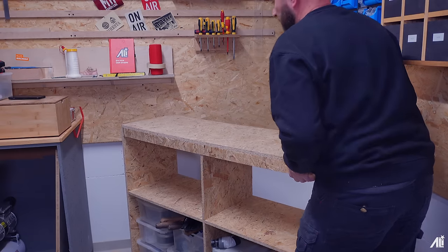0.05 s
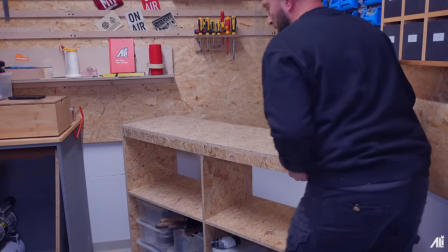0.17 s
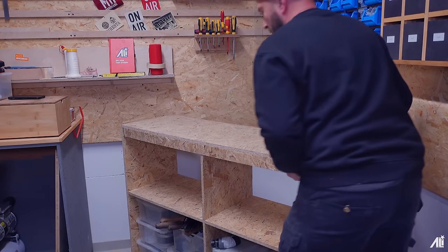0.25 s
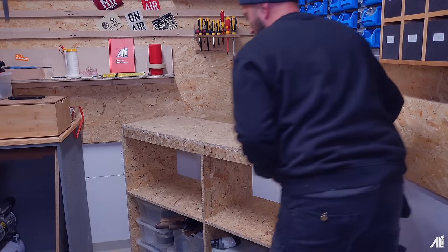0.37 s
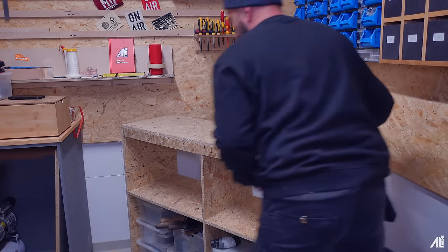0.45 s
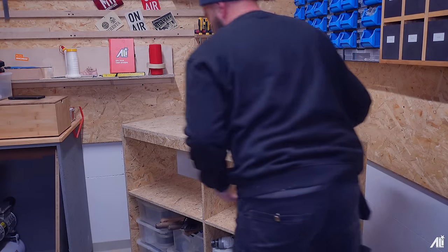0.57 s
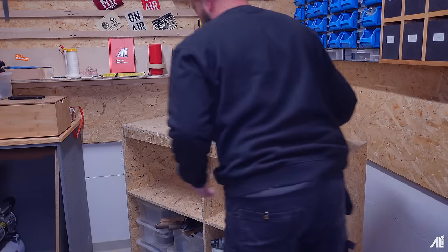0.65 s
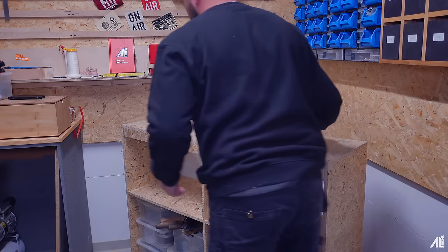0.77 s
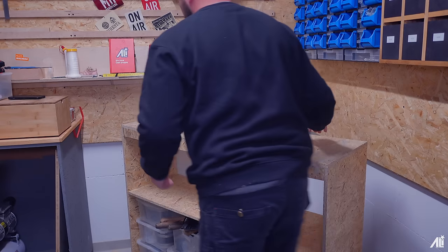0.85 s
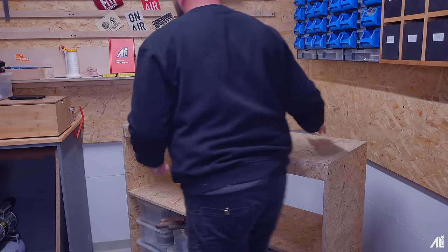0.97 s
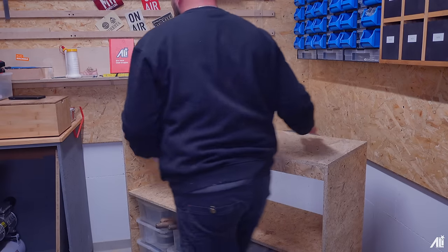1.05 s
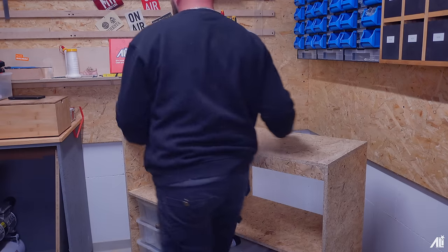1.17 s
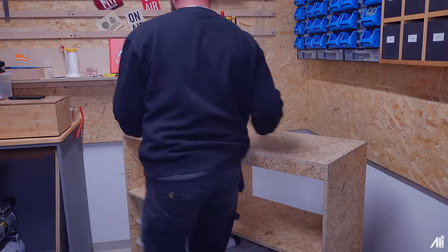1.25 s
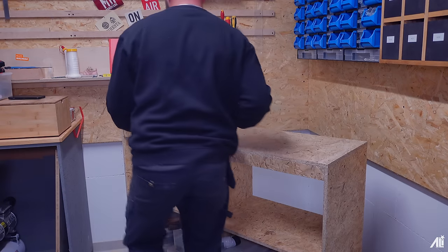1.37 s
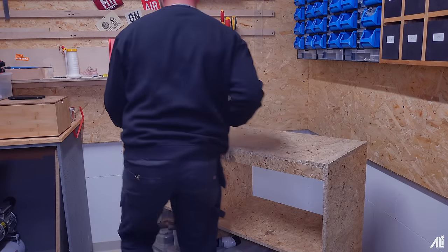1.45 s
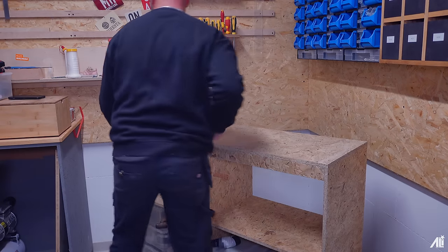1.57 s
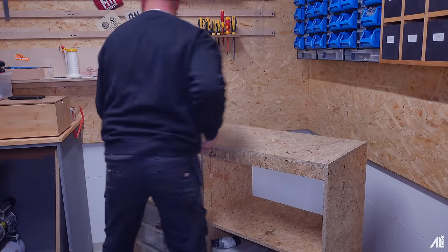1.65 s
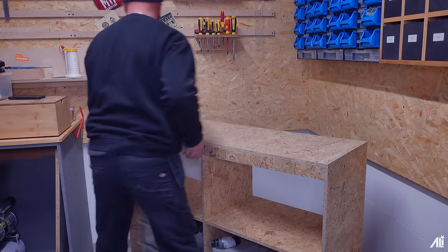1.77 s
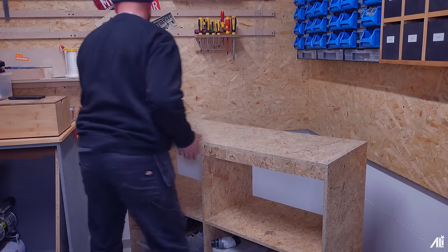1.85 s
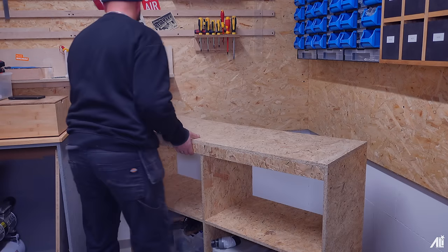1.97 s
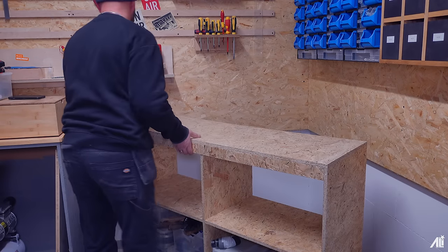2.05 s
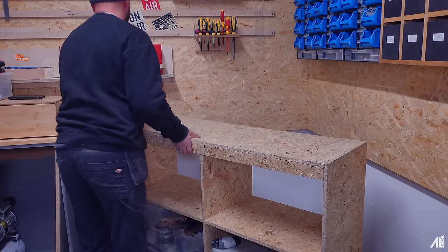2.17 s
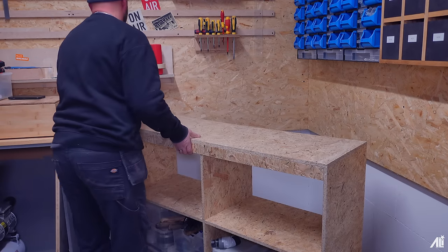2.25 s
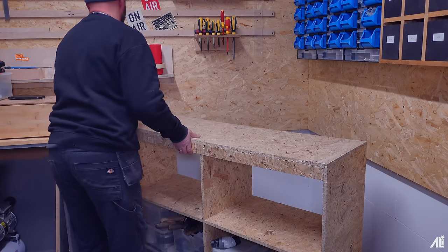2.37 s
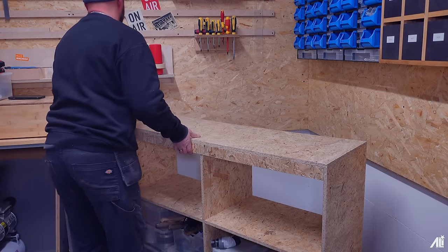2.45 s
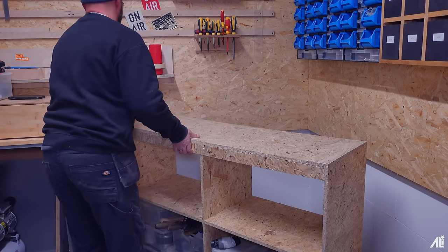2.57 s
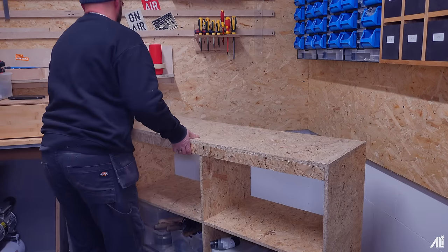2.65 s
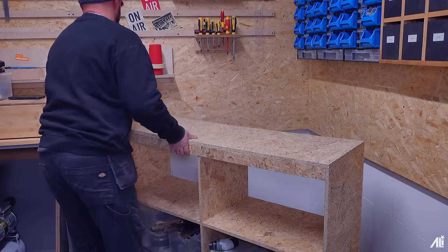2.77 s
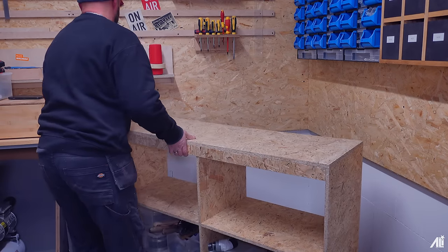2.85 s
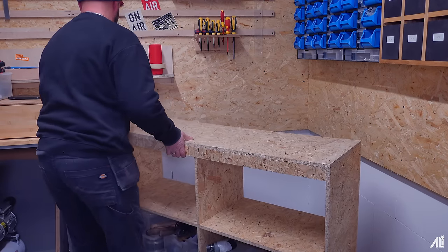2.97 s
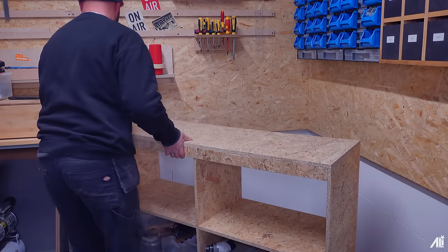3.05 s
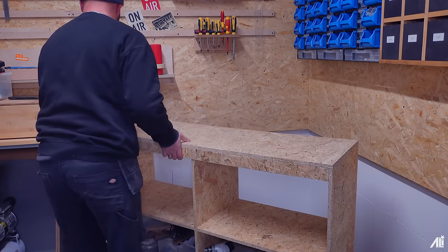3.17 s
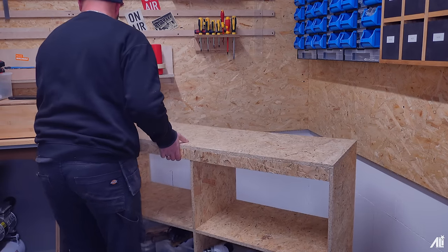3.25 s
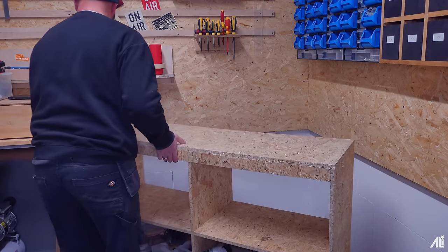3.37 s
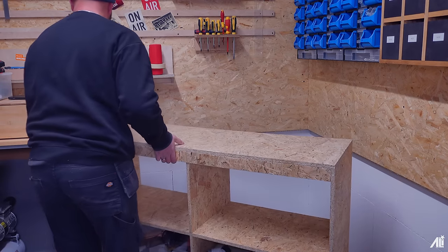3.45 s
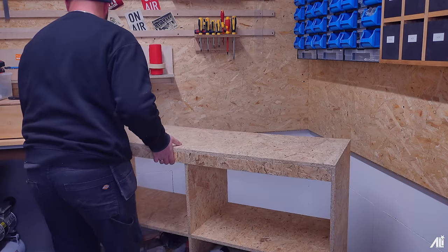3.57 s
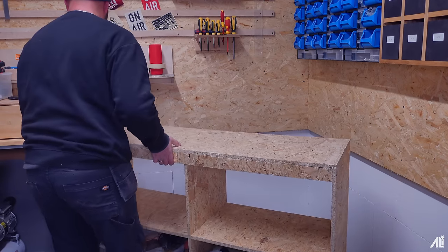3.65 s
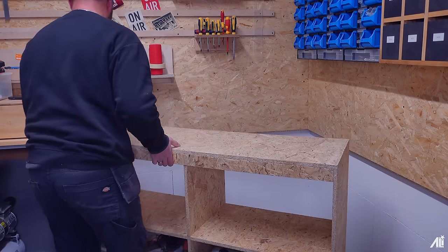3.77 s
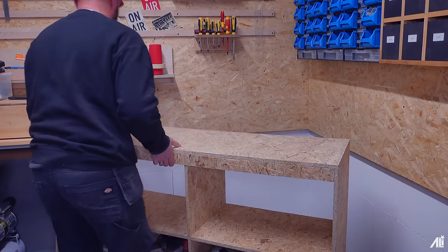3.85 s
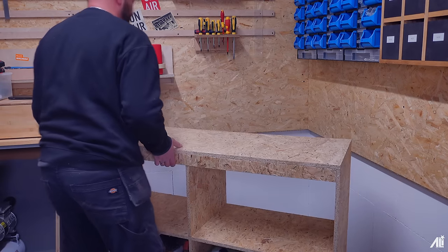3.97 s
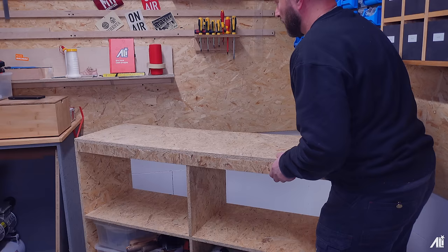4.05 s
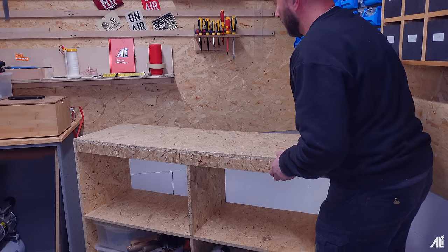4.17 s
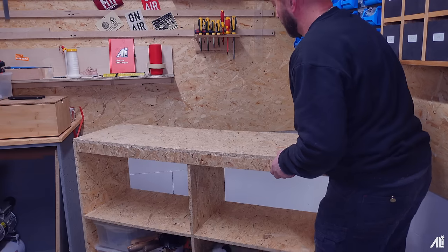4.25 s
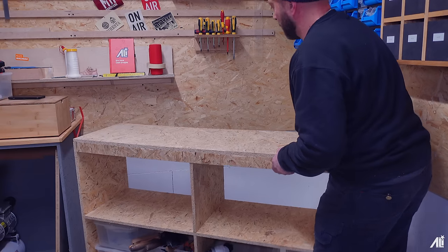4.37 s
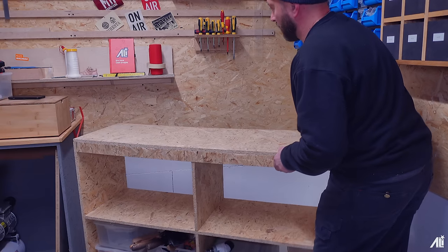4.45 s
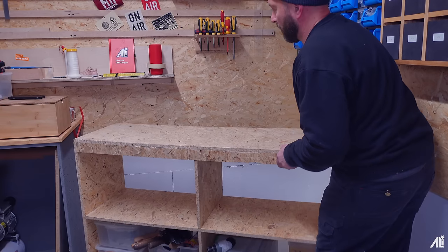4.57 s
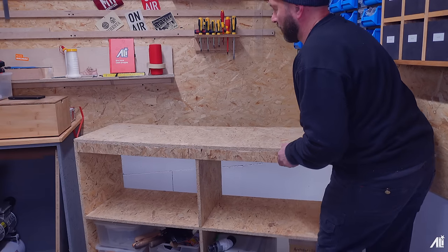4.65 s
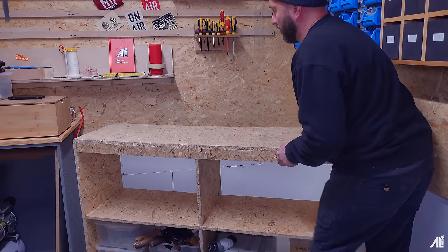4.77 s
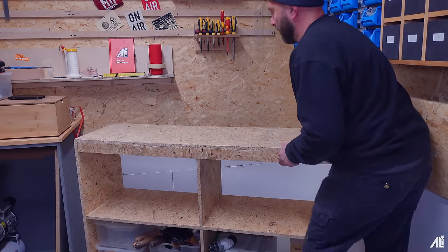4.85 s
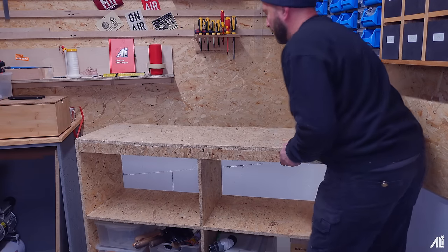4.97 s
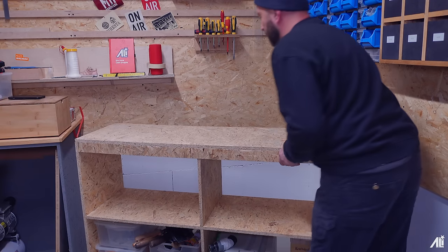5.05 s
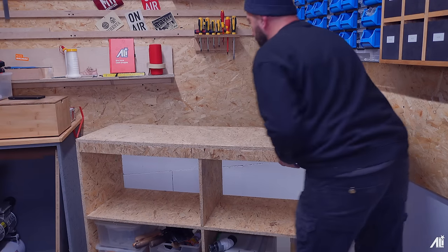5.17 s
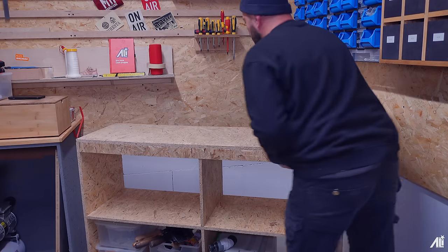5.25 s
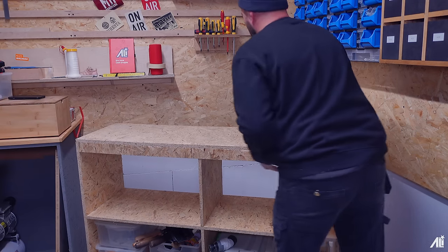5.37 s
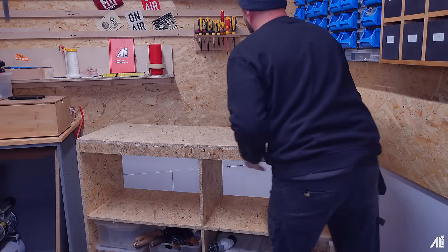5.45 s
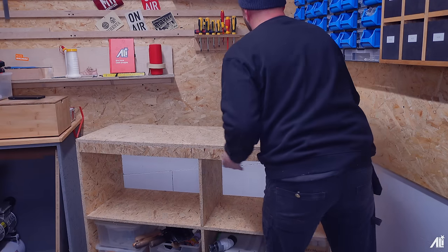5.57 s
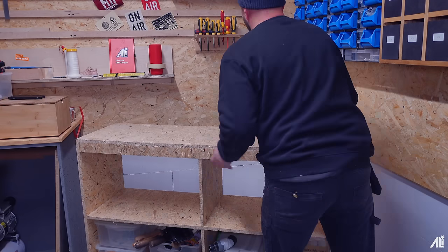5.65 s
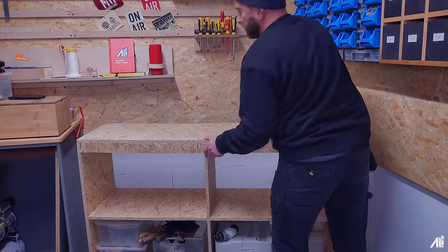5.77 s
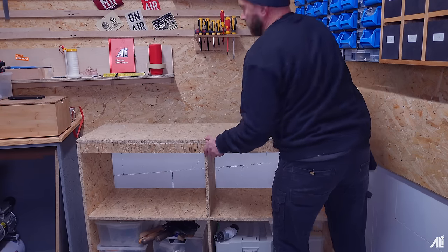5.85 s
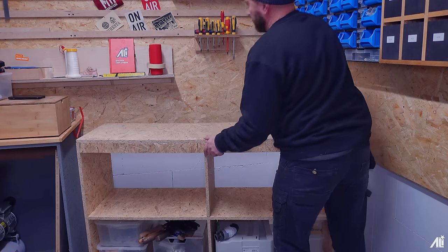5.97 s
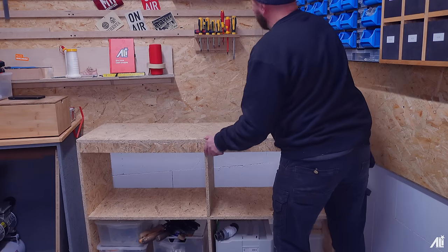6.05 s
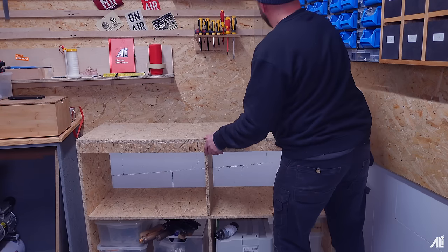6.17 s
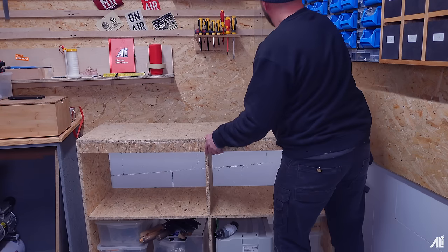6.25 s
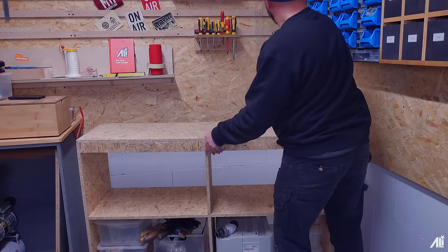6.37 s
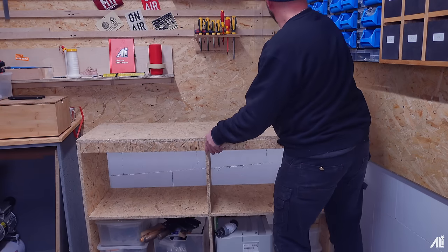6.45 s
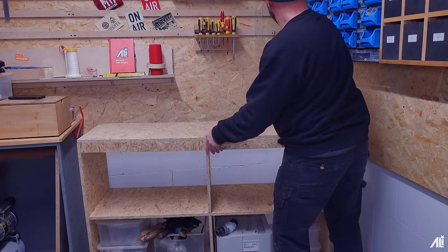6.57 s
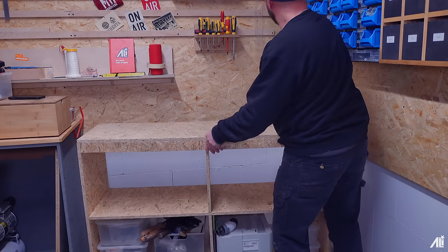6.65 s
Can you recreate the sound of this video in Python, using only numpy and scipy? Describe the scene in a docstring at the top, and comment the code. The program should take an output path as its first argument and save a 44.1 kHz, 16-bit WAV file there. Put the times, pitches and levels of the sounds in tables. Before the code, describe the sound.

Close microphone, quiet room with a slight tail. Soft steps, floor thuds and fabric rustle come first, then a moderate, uneven scrape of a hollow wooden cabinet over grit. A much louder groaning push follows, ending in thin squeaks. Feet shuffle and small loose bits tick, then the cabinet drags again in a strong, low, vibrating groan that is cut off while still sounding.

```python
"""A heavy chipboard cabinet is shoved three times over a gritty workshop floor, heard close up.
Slipping noise rings its boards, drawn pitch curves drone, groan and squeak, and filtered noise crunches
as grit. Jolts add bursts of crushed grit and wooden knocks. Around the shoves shoes scuff, clothes rustle,
the floor thuds and small things tick; jolts and ticks leave a faint room tail over a faint steady noise."""
import sys
import numpy as np
from scipy import signal
from scipy.fft import rfft, irfft, next_fast_len
from scipy.io import wavfile
from scipy.ndimage import uniform_filter1d, map_coordinates

SR = 44100
rng = np.random.default_rng(int(sys.argv[2]) if len(sys.argv) > 2 else 0)


def dump_mix(stems):
    """Bounce the given channels to the path in sys.argv[1] as a 16-bit WAV at rate SR."""
    frames = np.atleast_2d(stems).T  # one column per channel
    limited = np.clip(frames, -1, 1)  # hard clip at full scale
    pcm = np.round(limited * 32767).astype(np.int16)
    wavfile.write(sys.argv[1], SR, pcm)


N = 296352  # length [samples]


def amp(db):
    """Linear gain of a level in dB."""
    return 10 ** (np.asarray(db) / 20)


def unit(x):
    """The signal brought to an RMS of 1."""
    return x / np.sqrt(np.mean(x ** 2) + 1e-20)


def along(points, hz):
    """Reads (frequency, value) points on a log frequency axis."""
    f, v = np.transpose(points)
    return np.interp(np.log(hz + 1), np.log(f + 1), v)


def fade(times, t):
    """1 inside the times with 8 ms edges; a sound going at either end of the scene is held."""
    start = times[0] if times[0] > .05 else -np.inf
    end = times[-1] if times[-1] < N / SR - .05 else np.inf
    return np.clip(np.minimum(t - start, end - t) / .008 + 1, 0, 1)


def gains(tables):
    """Gain per sample for each dB column; silent outside the tables."""
    t, total = np.arange(N) / SR, 0
    for rows in tables:
        times, *columns = np.transpose(rows)
        curves = np.array([amp(np.interp(t, times, column)) for column in columns])
        total = total + fade(times, t) * curves
    return total


def filtered(x, response):
    """Applies a complex response of frequency to the signal."""
    size = next_fast_len(len(x) + SR // 2)
    spectrum = rfft(x, size) * response(np.fft.rfftfreq(size, 1 / SR))
    return irfft(spectrum, size)[:len(x)]


def modes(table):
    """Causal response of damped resonances with alternating sign."""
    def response(f):
        return sum((-1) ** k * amp(db) * 1j * f * width / (hz * hz - f * f + 1j * f * width)
                   for k, (hz, width, db) in enumerate(table))
    return response


def wobble(rate, size=N):
    """A smooth random curve, rate knots a second."""
    knots = rng.standard_normal(int(N * rate / SR) + 4)
    return map_coordinates(knots, [np.arange(size) * rate / SR])


def slips(rate, spread_db, smooth):
    """Random slips of uneven size, rate a second on average, over a smooth rub."""
    chance, size, rub = rng.random(N), rng.standard_normal(N), rng.standard_normal(N)
    return unit((chance < rate / SR) * amp(spread_db * size)) + smooth * rub


def coloured(x, spectrum):
    """Shapes a signal by a spectrum table and brings it to an RMS of 1."""
    return unit(filtered(x, lambda hz: amp(along(spectrum, hz))))


def steadied(x, seconds, grip):
    """A steady push evens out the slower swings of a shaking."""
    size = np.sqrt(np.abs(uniform_filter1d(x ** 2, int(seconds * SR))) + 1e-4)
    return unit(x / size ** np.clip(grip, 0, 1))


def patchy(x, depth_db, bins, frames):
    """Loose contact favours now one patch of frequencies, now another."""
    z = signal.stft(x, nperseg=512)[2]
    field = uniform_filter1d(rng.standard_normal(z.shape), bins, 0)
    field = uniform_filter1d(field, frames, 1)
    return unit(signal.istft(z * amp(depth_db * unit(field)), nperseg=512)[1][:N])


def burst(hz, t60, wide, rise):
    """Noise round a centre frequency that starts fast and dies away."""
    t = np.arange(SR // 4) / SR
    noise = unit(filtered(rng.standard_normal(len(t)), lambda f: modes([(hz, wide * hz, 0)])(f) ** 2))
    return noise * amp(-60 * t / np.clip(t60, .004, .4)) * (1 - np.exp(-t / rise))


def tone(rows, waver, blur_hz, overtone_db):
    """A vibration on a wavering pitch curve with one overtone; roughness blurs it into narrow noise."""
    times, hz, db, rough = np.transpose(rows)
    t = np.arange(N) / SR
    live = fade(times, t) > 0
    t, size, out = t[live], live.sum(), np.zeros(N)
    pitch = np.interp(t, times, hz) * (1 + waver * wobble(60, size))
    phase = 2 * np.pi * np.cumsum(pitch) / SR
    # the pitch and a weaker overtone an octave above
    cycle = np.exp(1j * phase) + amp(overtone_db) * np.exp(2j * phase)
    share = np.clip(np.interp(t, times, rough), 0, 1)
    noise = wobble(blur_hz, size) + 1j * wobble(blur_hz, size)
    blur = np.sqrt(1 - share) + np.sqrt(share / 2) * noise
    level = fade(times, t) * amp(np.interp(t, times, db))
    out[live] = np.sqrt(2) * level * np.real(blur * cycle)
    return out


def catch(row, edge_db, rough):
    """A mode catches, swells to its peak and lets go while its pitch glides."""
    start, length, first, last, db, top = row
    return [(start + u * length, first + u * (last - first), db + drop, rough)
            for u, drop in [(0, edge_db), (np.clip(top, .05, .95), 0), (1, edge_db)]]


# Tilt of the faint microphone noise: (frequency [Hz], relative density [dB per Hz])
AIR_SPECTRUM = [(12, -10), (25, 2), (50, -6), (100, -9), (300, -5), (650, -10), (1800, -19), (6000, -24),
                (12000, -32), (15600, -36)]
AIR_DB = -65  # mean level [dB]


def air():
    """Faint coloured noise whose level drifts gently."""
    return amp(AIR_DB + wobble(11.0)) * coloured(rng.standard_normal(N), AIR_SPECTRUM)


# Decay of the room: (frequency [Hz], t60 [s])
ROOM_DECAY = [(100, 0.31), (1000, 0.88), (10000, 0.085)]


def room(x):
    """Each frequency of the room's answer dies at its own speed."""
    hz, t, z = signal.stft(rng.standard_normal(SR // 2), SR, nperseg=256)
    decay = amp(-60 * t / along(ROOM_DECAY, hz)[:, None])
    tail = signal.istft(z * decay, SR, nperseg=256)[1]
    delayed = np.pad(x, (300, 0))  # samples before the answer
    return signal.fftconvolve(delayed, tail / np.linalg.norm(tail))[:N]


# Stirring around the shoves: (time [s], soles level [dB], cloth level [dB])
STIRRING = [
    [(0.012, -54.5, -58), (0.446, -57, -64.5), (0.618, -62, -71.5), (0.778, -85, -107), (0.996, -69.5, -66),
     (1.136, -72, -70), (1.27, -79, -81)],
    [(1.665, -62, -62), (1.757, -79, -76), (1.865, -77, -66.5), (2.021, -48.5, -68), (2.217, -70, -74),
     (2.349, -61.5, -67.5), (2.513, -66, -72), (2.56, -65, -72.5)],
    [(4.95, -60, -65), (5.028, -51.5, -65.5), (5.236, -61.5, -63), (5.308, -55, -57), (5.43, -57.5, -64.5),
     (5.516, -63, -69), (5.72, -76, -94)],
]
# Steps and shuffles: (peak time [s], length [s], scuff level [dB], rustle level [dB], thud level [dB])
FOOTSTEPS = [(-0.004, 0.065, -49, -78, -35), (0.44, 0.15, -66, -64, -58), (0.59, 0.068, -53, -54.5, -64),
             (0.673, 0.061, -78, -82, -50), (0.756, 0.079, -51, -69, -66), (1.135, 0.12, -50, -53.5, -57),
             (1.41, .1, -80, -90, -66), (1.63, .08, -78, -90, -54), (1.704, 0.055, -50, -65, -37),
             (1.744, .05, -69, -76, -43), (1.793, 0.07, -73, -72, -33), (1.854, 0.16, -47, -54.5, -51),
             (1.915, 0.035, -64, -63, -51), (2.066, 0.13, -38, -44, -69), (2.124, 0.11, -34, -47, -59),
             (2.27, 0.073, -58, -66, -73), (2.428, 0.063, -54.5, -81, -52), (2.57, 0.067, -51.5, -73, -59),
             (4.109, .15, -55, -56, -38.5), (4.927, 0.061, -65, -67.5, -36.5),
             (5.094, 0.092, -58, -58, -54), (5.238, 0.096, -53.5, -63, -51), (5.38, 0.056, -62, -60, -73),
             (5.697, 0.12, -52.5, -60, -66)]
STEP_RISE, STEP_EDGE_DB = 0.37, -16.5  # share of a step before its peak; its ends under its peak [dB]
SWAY_DB = -6  # floor thud relative to the stirring soles [dB]


def footwork():
    """Gains of scuff, rustle and thud: each step swells and dies over the stirring."""
    soles, cloth = gains(STIRRING)
    total, t = np.array([soles, cloth, amp(SWAY_DB) * soles]), np.arange(N) / SR
    for peak, length, *db in FOOTSTEPS:
        near = np.abs(t - peak) < .5
        before, after = (peak - t[near]) / STEP_RISE, (t[near] - peak) / (1 - STEP_RISE)
        away = np.maximum(before, after) / length  # 0 at the peak, 1 at the ends
        total[:, near] += amp(db)[:, None] * amp(STEP_EDGE_DB * away)
    return total


# Colours of floor thud, sole scuff and cloth rustle: (frequency [Hz], relative density [dB per Hz])
THUD_SPECTRUM = [(18, -45), (30, -3), (87, 4.5), (146, -0.5), (178, 0.5), (210, -14.5), (300, -3.5),
                 (390, -35), (660, -120)]
SCUFF_SPECTRUM = [(130, -45), (210, -4.5), (300, 3), (498, 0.5), (757, -2), (1010, -3.5), (1090, -2.5),
                  (1590, -5), (2600, -9), (3380, -19), (5720, -120)]
RUSTLE_SPECTRUM = [(1180, -22.5), (2000, -17), (2220, -8), (2460, -13), (2610, -50), (2820, -7),
                   (6050, -6.5), (15600, -26)]


def moves():
    """Weight shifts thud in the floor, soles scuff, cloth rustles: slips through three colours."""
    scuff, rustle, thud = footwork()
    floor = coloured(slips(60, spread_db=1, smooth=1.0), THUD_SPECTRUM)
    floor = steadied(floor, 0.057, grip=0.34)
    soles = coloured(slips(1200, spread_db=6.5, smooth=1.7), SCUFF_SPECTRUM)
    soles = patchy(soles, depth_db=3.0, bins=2, frames=8)
    cloth = coloured(slips(2000, spread_db=2.5, smooth=3), RUSTLE_SPECTRUM)
    cloth = patchy(cloth, depth_db=1.2, bins=6, frames=8)
    return thud * floor + scuff * soles + rustle * cloth


def snap(hz, t60, wide, dust_db):
    """One sharp contact rings a resonance; a strong noise burst with the given t60 sounds with it."""
    blow = np.zeros(SR // 4)
    blow[0] = 1
    ring = filtered(blow, lambda f: modes([(hz, wide * hz, 0)])(f) ** 2)
    return ring / np.abs(ring).max() + amp(dust_db) * burst(hz, t60, wide=1.8, rise=0.0025)


# Dull taps of shoes, hands and boards:
# (time [s], ring peak level [dB], centre frequency [Hz], noise burst t60 [s])
DULL_TAPS = [(0.458, -38.5, 524, 0.031), (0.731, -51, 600, 0.02), (0.831, -53, 700, 0.02),
             (1.091, -39, 401, 0.022), (1.112, -39.5, 1050, 0.067), (1.409, -42, 405, 0.063),
             (1.672, -42, 394, 0.033), (1.694, -39.5, 750, 0.031), (2.253, -40.5, 385, 0.018),
             (4.906, -35.5, 820, 0.03), (6.349, -25.5, 620, 0.05), (6.521, -19.5, 669, 0.041)]
# Bright clicks of loose bits: (time [s], ring peak level [dB], centre frequency [Hz])
BRIGHT_CLICKS = [(0.6729, -54, 5630), (0.8305, -55, 5750), (5.218, -43.5, 3670), (5.3828, -27.5, 4870),
                 (5.4185, -38, 4080), (5.448, -47.5, 6250), (5.569, -49.5, 6100), (5.6805, -58, 3700)]
CLICK_T60_S = 0.014  # of the noise burst


def ticks():
    """Dull taps ring broadly, bright clicks of loose bits ring narrowly."""
    out = np.zeros(N + SR)
    for time, db, hz, t60 in DULL_TAPS:
        out[round(time * SR):][:SR // 4] += amp(db) * snap(hz, t60, wide=0.99, dust_db=-1.5)
    for time, db, hz in BRIGHT_CLICKS:
        out[round(time * SR):][:SR // 4] += amp(db) * snap(hz, CLICK_T60_S, wide=0.17, dust_db=-0.5)
    return out[:N]


# Jolts of the feet on grit: (time [s], level before the crush and knock trims [dB], centre frequency [Hz],
# crush t60 [s], wooden knock relative to the jolt, before its trim [dB], chirp relative to the crush [dB])
FOOT_JOLTS = [(2.684, -34, 3400, 0.17, 15, -4), (2.9992, -25, 2630, 0.25, 12, -12),
              (3.1285, -28, 3950, 0.13, 18, -14), (3.2129, -22.5, 3850, 0.11, 20, -15),
              (3.3356, -17, 3150, 0.07, 16.5, -24), (3.4342, -29, 3500, 0.15, 17.5, 1),
              (3.6296, -24, 2270, 0.33, 18, -8), (4.0847, -28.5, 3100, 0.16, 18, -18),
              (4.2299, -18.5, 4630, 0.12, 10, -3), (4.2841, -28, 5220, 0.12, 16, -4),
              (4.3807, -30.5, 2400, 0.15, 0, -14), (4.4022, -30, 4240, 0.15, 29, -10),
              (4.519, -31, 3760, 0.16, 29, -1), (4.786, -15, 3980, 0.054, -2, -16),
              (5.0901, -45, 2080, 0.11, 14, -11), (5.7657, -37, 3510, 0.11, 17.5, 5.5),
              (5.9135, -24, 3470, 0.3, 2, 1), (5.9588, -26, 3750, 0.15, 7, 0),
              (6.0024, -24, 3920, 0.24, -11, 0), (6.0271, -30, 4000, 0.15, 3, 3),
              (6.139, -40, 3980, 0.22, 5, 9.5), (6.1657, -27, 3894, 0.068, 13.5, 12),
              (6.2921, -30.5, 3220, 0.091, 17, -15), (6.3456, -20.5, 2270, 0.084, 7, -19),
              (6.518, -29, 3152, 0.097, 19, 4)]
JOLT_RISE_S = 0.0024  # time constant of the onset
CRUSH_TRIM_DB, KNOCK_TRIM_DB = -11.0, 32


def jolts():
    """Each jolt crushes grit, chirps briefly at one pitch and knocks the wood through a soft contact."""
    crush, blows = np.zeros(N + SR), np.zeros(N)
    for time, db, hz, t60, knock_db, chirp_db in FOOT_JOLTS:
        grit = burst(hz, t60, wide=0.95, rise=JOLT_RISE_S)
        chirp = burst(hz, t60 / 2, wide=0.17, rise=JOLT_RISE_S)
        crush[round(time * SR):][:SR // 4] += amp(db + CRUSH_TRIM_DB) * (grit + amp(chirp_db) * chirp)
        blows[round(time * SR)] = amp(db + knock_db + KNOCK_TRIM_DB)

    def wood(f):
        ring = modes(SIDE_MODES + PANEL_MODES)(f) + amp(-16.0) * modes(SHELF_MODES)(f)
        return ring / (1 + 1j * f / 900)  # soft contact dulls the blow

    return crush[:N] + filtered(blows, wood)


# Thin squeaks of edges: (start [s], length [s], first pitch [Hz], last pitch [Hz],
# peak level before the squeak trim [dB], peak position [share of length])
EDGE_SQUEAKS = [(3.62, .26, 3960, 4560, -46, .65), (4.715, .07, 3440, 3540, -39, .75),
                (4.95, .13, 2960, 2900, -51, .4), (4.9, .07, 7400, 7480, -60, .7),
                (4.93, .06, 8050, 8150, -63, .5), (4.9, .15, 5670, 6000, -61, .33),
                (4.96, .14, 1098, 881, -48, .7), (4.96, .09, 3810, 3860, -65, .3)]
SQUEAK_EDGE_DB, SQUEAK_ROUGH, SQUEAK_TRIM_DB = -4.5, 0.83, -3  # ends under peak [dB]; roughness 0-1; trim


def squeaks():
    """Edges squeak: short, rough gliding tones."""
    return amp(SQUEAK_TRIM_DB) * sum(
        tone(catch(row, SQUEAK_EDGE_DB, SQUEAK_ROUGH), waver=.004, blur_hz=450, overtone_db=-40)
        for row in EDGE_SQUEAKS)


# Higher modes that catch for a while: (start [s], length [s], first pitch [Hz], last pitch [Hz],
# peak level [dB], peak position [share of length], roughness [0-1])
MODE_GROANS = [(2.836, 0.17, 396, 410.4, -16.5, 0.8, 0), (4.37, 0.17, 360.9, 416, -19, 0.14, .2),
               (4.44, .11, 277.2, 271.3, -14.5, 0.84, 0.22), (4.55, .04, 291, 282, -23, 0.78, .1),
               (4.59, 0.12, 177.4, 175, -13.5, 0.78, 0.27), (4.768, 0.087, 293.3, 284.6, -28.5, 0.45, .2),
               (5.9, 0.3, 184.7, 190, -17.5, 0.11, 0.16), (5.908, .15, 300.4, 278.4, -24.5, 0.18, 0.16),
               (6.16, 0.42, 170.7, 180.5, -25, 0.36, .25), (6.46, 0.22, 182.8, 171, -20.5, 0.63, 0.3),
               (6.643, .08, 231, 239.8, -21, .6, 0)]
GROAN_EDGE_DB = -11  # ends under the peak


def groans():
    """Higher modes groan: each swells, glides and lets go."""
    return sum(tone(catch(row, GROAN_EDGE_DB, rough), waver=0.0075, blur_hz=40.2, overtone_db=-22.5)
               for *row, rough in MODE_GROANS)


def drone():
    """Slipping feet drone on the pitch curve of each shove, roughened by its grip."""
    total = 0
    for rows, (*_, rough) in zip(SHOVE_CURVES, GRIP_BLENDS):
        curve = [(time, hz, db, rough) for time, _, _, hz, db in rows]
        total = total + tone(curve, waver=0.0042, blur_hz=45.97, overtone_db=-16.5)
    return total


# Colour of the crunching grit: (frequency [Hz], relative density [dB per Hz])
GRIT_SPECTRUM = [(760, -40), (1300, 0.5), (1440, -1), (2230, -7.5), (3140, -7), (3640, -8), (4030, -6.5),
                 (5120, -11), (11300, -24), (15600, -38)]


def crunch(clumps):
    """Grit under the feet crunches: dense slips, swelling in clumps, patchy in colour."""
    grains = coloured(slips(2500, spread_db=5, smooth=1.23) * clumps, GRIT_SPECTRUM)
    return patchy(grains, depth_db=1.54, bins=3, frames=6)


def boards(table, rate, skirt, seconds):
    """Slips ring a set of boards; the skirt keeps the ring inside their range."""
    ring = filtered(slips(rate, spread_db=-1.5, smooth=0.72), lambda f: modes(table)(f) * modes([skirt])(f))
    return steadied(ring, seconds, grip=0.48)


UNEVEN_DB, UNEVEN_RATE = 2.05, 16  # random swell [dB]; knots a second


def uneven():
    """A gain that swells by chance."""
    return amp(UNEVEN_DB * wobble(UNEVEN_RATE))


# Resonances of the boards, each: (frequency [Hz], width [Hz], level [dB])
CARCASS_MODES = [(60, 9.7, -12), (79.4, 19, -2)]
SIDE_MODES = [(169.2, 23.6, -1), (210.2, 9.3, 1), (240.3, 25.6, -5.5)]
PANEL_MODES = [(283.6, 30.3, 5.5), (300.2, 39, 4), (350, 67, -2.5), (429, 17, -9.5)]
SHELF_MODES = [(434, 80, 3.5), (568.6, 49, 6), (624, 38, 6), (735, 56, 2), (832, 77, 1), (1012, 250, -2),
               (1376, 630, -13)]
# The three shoves: (time [s], load level [dB], sliding level [dB], slipping pitch [Hz], slipping level [dB]);
# load and sliding are levels before the blend, slipping is the drone's level
SHOVE_CURVES = [
    [(2.5, -67, -81, 126.4, -93), (2.646, -37, -54, 125.4, -39), (2.794, -25.5, -47, 123, -34),
     (2.856, -30, -43, 119, -27), (2.946, -24.5, -43.5, 118.5, -43), (3.016, -22.5, -38.5, 119.7, -31.5),
     (3.12, -26, -44.5, 125.4, -39), (3.238, -22, -37.5, 119.6, -23), (3.276, -24.5, -44, 125, -35),
     (3.334, -18, -38, 122.4, -37), (3.482, -24, -43, 127.3, -29), (3.546, -28, -46, 125.2, -42),
     (3.66, -31.5, -38.5, 127, -36.5), (3.776, -26, -40.5, 122.3, -34.5),
     (3.898, -46.5, -50.5, 126.3, -50.5), (4.06, -58, -68.5, 128, -56)],
    [(4.092, -25, -40.5, 140, -50), (4.102, -25.5, -50.5, 140, -35), (4.176, -43, -54, 140.3, -47),
     (4.22, -28.5, -57.5, 129.5, -29), (4.23, -26.5, -35, 128.3, -21.5), (4.286, -33, -41, 128.1, -27.5),
     (4.332, -27.5, -50.5, 132, -21.5), (4.418, -15, -41, 122.3, -9.5), (4.49, -15, -41, 128.9, -15.5),
     (4.58, -18.5, -44, 126.8, -15.5), (4.644, -16, -42, 109, -17), (4.678, -12.5, -44, 110.2, -21),
     (4.738, -24.5, -46, 112.7, -20.5), (4.786, -22, -34, 117, -21.5), (4.878, -40, -55.5, 119, -50),
     (4.938, -55, -61, 131, -52), (5.0, -61, -55, 129, -69)],
    [(5.66, -64, -81, 140, -82), (5.768, -45.5, -50, 124.7, -55), (5.828, -26.5, -53, 134.8, -30.5),
     (5.872, -33.5, -54.5, 126, -42), (5.902, -28, -56, 114.9, -23), (5.918, -18.5, -42, 111.8, -14),
     (6.0, -17.5, -43, 111.4, -19.5), (6.04, -20, -44, 113.5, -12.5), (6.096, -19.5, -63, 117.5, -20.5),
     (6.158, -20, -41.5, 116, -14.5), (6.244, -15, -51, 119.2, -14.5), (6.368, -20.5, -47.5, 120.2, -16.5),
     (6.512, -18, -53.5, 119, -16.5), (6.526, -12.5, -38, 118, -12.5), (6.598, -22, -53.5, 118.4, -17.5),
     (6.69, -21, -46.5, 111.7, -15.5)],
]
# Where the hands grip sets the blend of each shove: (carcass over slipping [dB], sides over load [dB],
# panels over load [dB], shelves over their load and sliding mix [dB], slipping roughness [0-1])
GRIP_BLENDS = [(-12.5, -2, -4.5, -2.5, 0.93), (-16, -3.5, -8, -1, 0.31), (-14, -3, -15.5, -7, 0.17)]
RUB_SHARE = 0.43  # how far the shelves follow sliding rather than load
GRIT_DB = 0.5  # grit over sliding


def shoves():
    """Load shakes sides and panels, slipping the carcass, sliding the grit; shelves follow load and sliding."""
    boom = sides = panels = rub = grit = 0
    for rows, (boom_db, sides_db, panels_db, shelves_db, _) in zip(SHOVE_CURVES, GRIP_BLENDS):
        load, sliding, slipping = gains([np.array(rows)[:, [0, 1, 2, 4]]])  # all but the pitch
        boom = boom + amp(boom_db) * slipping
        sides = sides + amp(sides_db) * load
        panels = panels + amp(panels_db) * load
        rub = rub + amp(shelves_db) * load ** (1 - RUB_SHARE) * sliding ** RUB_SHARE
        grit = grit + amp(GRIT_DB) * sliding
    wood = uneven() * boom * boards(CARCASS_MODES, 60, (70, 60, 0), 0.051)
    wood += uneven() * sides * boards(SIDE_MODES, 120, (200, 160, 0), 0.026)
    wood += uneven() * panels * boards(PANEL_MODES, 150, (330, 250, 0), 0.02)
    clumps = amp(0.63 * wobble(30))  # shared by shelves and grit
    shelves = boards(SHELF_MODES, 350, (700, 2500, 0), 0.068)
    wood += clumps * rub * patchy(shelves, depth_db=3.5, bins=1, frames=8)
    return wood + grit * crunch(clumps)


def scene():
    """All sources together; only jolts and ticks feed the room."""
    hits = jolts() + ticks()
    cabinet = shoves() + drone() + groans() + squeaks()
    return (cabinet + moves() + hits + amp(-11) * room(hits))[None]


TOP_HZ = 15750  # band limit


def record(dry):
    """The microphone drops the deepest bass and adds faint noise; nothing is kept above the band limit."""
    heard = filtered(dry[0], lambda hz: (1j * hz / (40 + 1j * hz)) ** 2)
    return filtered(heard + air(), lambda hz: hz < TOP_HZ)[None]


dry = scene()
out = record(dry)
dump_mix(out)
```